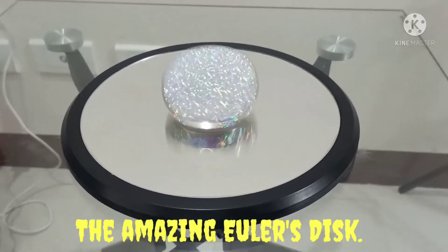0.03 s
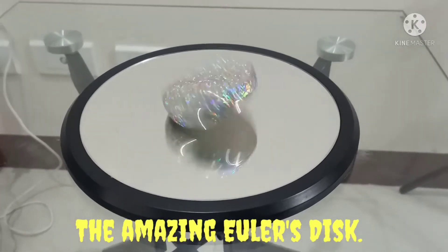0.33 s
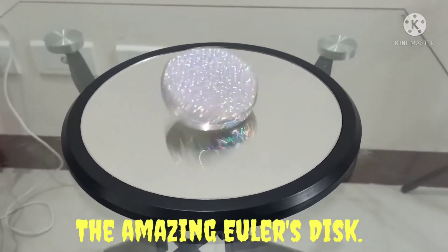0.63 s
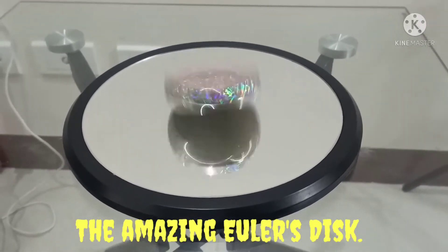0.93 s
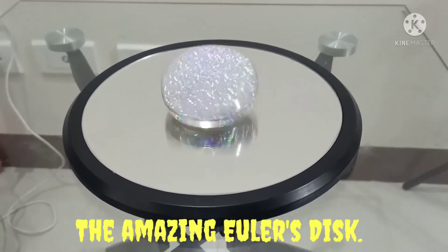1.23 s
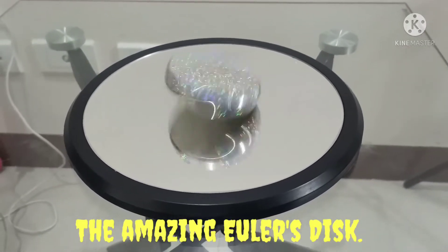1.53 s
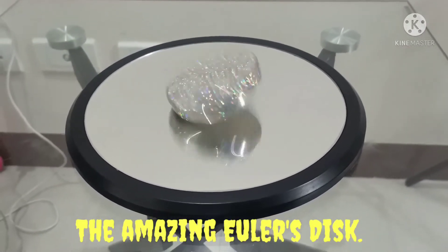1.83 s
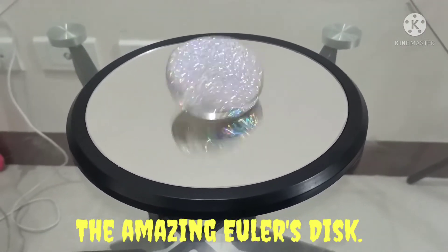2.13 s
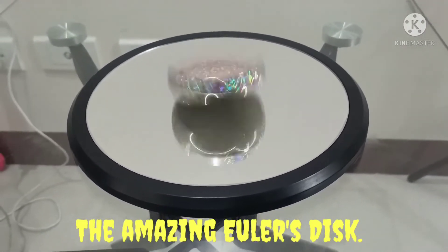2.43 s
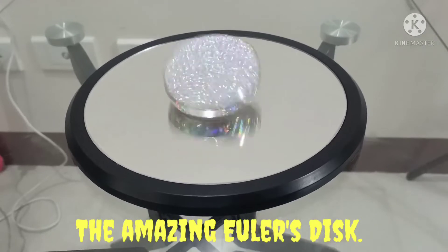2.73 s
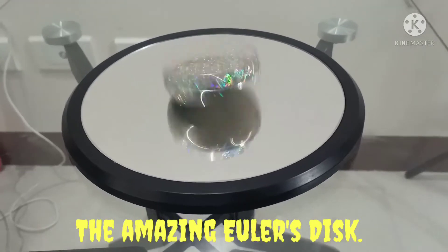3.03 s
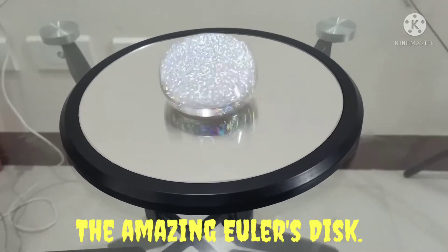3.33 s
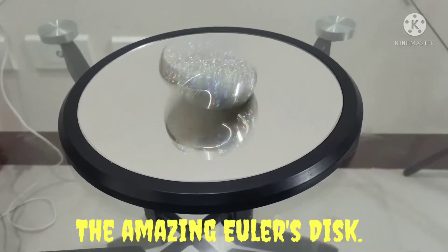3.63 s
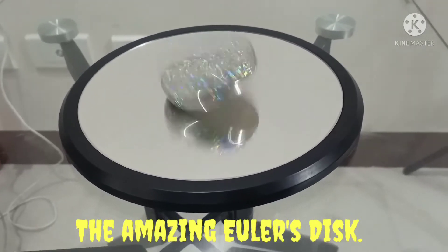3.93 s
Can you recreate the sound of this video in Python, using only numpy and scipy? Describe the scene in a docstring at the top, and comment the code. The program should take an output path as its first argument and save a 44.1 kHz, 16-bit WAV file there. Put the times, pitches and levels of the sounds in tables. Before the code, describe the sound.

A spinning metal disk whirs and rings close by on a mirror, wavering in fast, even pulses. Several times a second its base cracks and thuds against the glass table, while a small room rumbles faintly behind.

```python
"""A gritty, pulsing metallic ring: a heavy metal disk rolls on its rim round a mirror base on a glass table.
The contact point laps the mirror about eight times a second, slowly gaining speed. Tiny bumps under
the rim ring disk and mirror, whose resonances swell, fade and bend with each lap. Several times a
second the base knocks on the table with a crack and a thud. Behind it, a small room rumbles low."""
import sys
import numpy as np
from scipy import signal
from scipy.fft import rfft, irfft
from scipy.io import wavfile

SR = 44100
rng = np.random.default_rng(int(sys.argv[2]) if len(sys.argv) > 2 else 0)


def transcribe(u):
    """Save the signal u as a 16-bit wav file named by the first command-line argument.

    u: samples, shape (n,) or (channels, n), limited to [-1, 1]; the rate is SR.
    q: integer samples, one column per channel.
    """
    v = np.clip(np.atleast_2d(u).T, -1, 1)
    q = np.round(v * 32767).astype(np.int16)
    wavfile.write(sys.argv[1], SR, q)


N = 176400
TIME = np.arange(N) / SR

# tone of the room's rumble: (frequency [Hz], relative density [dB])
RUMBLE_COLOUR = [(15, -6.5), (26, 6.5), (42, -16.5), (59, 1), (80, -15.5), (150, -15.5), (235, -14.5),
                 (300, -18.5), (420, -31.5), (900, -52)]
# decay of the room's tail: (frequency [Hz], time to fall 60 dB [s])
ROOM_DECAY = [(200, 0.76), (1000, 0.25), (4000, 0.14), (14000, 0.28)]
# knocks of the base on the table: (time [s], sharp drive [dB], low drive [dB])
KNOCK_CUES = [(0.099, -21.5, -55), (0.112, -28, -47), (0.36, -26, -51), (0.469, -27, -55),
              (0.568, -25, -40), (0.688, -27.5, -65), (0.807, -25.5, -53), (0.825, -28, -64),
              (0.918, -26, -69), (1.041, -19.5, -40.5), (1.055, -27.5, -70), (1.067, -33, -54),
              (1.191, -25.5, -54), (1.274, -25.5, -41.5), (1.511, -22.5, -60), (1.536, -25, -49),
              (1.629, -22.5, -45), (1.744, -24.5, -44.5), (1.764, -32, -56), (1.985, -32, -65),
              (2.213, -23, -65), (2.243, -25, -62), (2.33, -23.5, -59), (2.589, -28, -46.5),
              (2.711, -27.5, -41), (2.912, -25, -53), (2.944, -28.5, -64), (3.03, -23, -50),
              (3.259, -24, -45.5), (3.524, -26, -59), (3.608, -22.5, -47), (3.724, -26, -52),
              (3.955, -22.5, -40), (3.978, -23.5, -47)]
# tone of a knock's dry crack: (frequency [Hz], relative level [dB])
CRACK_COLOUR = [(200, -20), (420, -58), (600, -31), (850, -8), (1150, -24.5), (1500, 1), (1800, 5),
                (2200, -6), (2750, -28), (3300, -21), (5000, -24), (7500, -4.5), (9000, -36.5),
                (15000, -48)]
# how hard a knock's sharp part rings the resonances: (frequency [Hz], relative drive [dB])
KNOCK_DRIVE = [(900, 65.5), (1300, 59), (1540, 67.5), (1850, 31), (2200, 55), (3300, 59.5), (7500, 45),
               (14000, 50)]
# modes of base and table, the same all round the lap: (pitch [Hz], width [Hz], gain [dB])
BASE_MODES = [(225, 110, -78), (300, 35, -80), (520, 45, -74.5), (573, 26, -70.5), (665, 50, -78),
              (800, 40, -75), (865, 35, -64), (950, 35, -61.5), (1002, 35, -65), (1049, 30, -64),
              (1165, 35, -69.5), (1253, 25, -69), (1310, 30, -66)]
# resonances of disk and mirror: (pitch [Hz], width [Hz], gain [dB], swing once a lap [dB], peak [laps],
# swing twice a lap [dB], peak [laps], swing once a rim turn [dB])
DISK_MODES = [ (931, 49, -60, 1.5, .4, 1.8, 0.034, 0.2), (1344, 59, -58.5, 0.6, 0, 0.19, 0.74, 0.24),
              (1450, 80, -55.5, 4, .1, .8, .52, .8), (1534, 100, -48.0, 3.3, .13, .8, .53, .8),
              (1835, 170, -57.5, .3, .95, 2.2, .01, .5), (2016, 56.7, -56.5, 1.0, 0.0081, 0.41, 0.19, 2.5),
              (2170, 111, -53, 2.2, 0.68, 0.84, 0.57, 3.16), (2285, 24, -66, 1.3, 0.36, 0.57, 0.035, 0.79),
              (3259, 135, -59, 0.58, 0.2, 3.1, 0.096, 0.13), (3520, 130, -67, 1.8, 0, 0.92, 0.62, 0.19),
              (3960, 87, -70, 1.4, 0.24, 2.6, 0, 0.32), (4466, 470, -62.5, 1.2, 0.16, 1.2, 0, 0.84),
              (5730, 324, -61.5, 0.77, .0, 0.17, 0.13, 0.79), (6060, 260, -62, 1.5, .0, 0.7, 0, .9),
              (6874, 220, -57.5, 0.6, 0.59, 0.6, 0, 1.56), (7256, 330, -58.5, 4.7, 0, 3.2, 0.0084, 1.8),
              (7670, 380, -56.5, 3.2, .99, 3.5, 0.092, 1.3), (8150, 160, -64, 0.27, 0.71, 0.24, 0, 0.59),
              (9430, 690, -67.5, 0.67, 0.39, 2.9, 0.1, 1.4), (11260, 200, -75.5, 3.8, 0.94, 2.3, 0.43, 2.2),
              (11370, 260, -72, 1, 1, .6, 0.56, 1.6), (12870, 89, -83, 3.0, .06, 2.2, .0, 2.1),
              (13800, 290, -75.5, 2, .47, 2.5, .15, 1.3), (15000, 1100, -77, .6, .4, 1.5, .1, 1.0)]
# the moving load bends the pitch: (frequency [Hz], once a lap [fraction], twice a lap [fraction])
LOAD_BEND = [(1000, 0.0032, 0.0023), (1540, 0.014, 0.005), (2350, 0.0049, 0.0016), (3300, .018, -0.002),
             (4500, .005, .007), (5900, 0.0068, 0.007), (7170, 0.014, 0.022), (8100, 0.0053, 0.015),
             (9500, .001, 0.0049), (14300, .001, .001)]
# slow level ride on the rolling tones near 2 kHz: (time [s], level [dB])
SING_RIDE = [(0, 0.5), (1.3, -0.8), (2.3, -2), (3.35, 2.5), (3.7, 0), (4, 0.5)]

LAPS_PER_S, LAPS_GAIN_PER_S2, START_LAP = 8.425, .062, .1585
RIM_TURNS_PER_LAP, RIM_ROUGHEST_TURN = .841, .89
BEND_ONCE_PEAK_LAP, BEND_TWICE_PEAK_LAP = .55, .42
BUMPS_PER_S, BUMP_SPREAD_DB = 9000, 2
FLUTTER_DB, FLUTTER_HZ = .68, 129  # unsteady contact force
ROLL_DB, ROLL_RISE_DB_PER_S = -.36, .3144  # the rolling grows a little with speed
SING_FROM_HZ, SING_TO_HZ = 1950, 2500
RATTLE_DECAY_S, RATTLE_DB = .0067, -7
CRACK_GAIN_DB, KNOCK_RING_GAIN_DB = 19, -7.5
THUD_HZ, THUD_WIDTH_HZ, THUD_GAIN_DB = 730, 287, 19.5
TABLE_RING_BELOW_HZ, TABLE_RING_GAIN_DB = 920, 76.5
RUMBLE_DB, ROOM_SEND_DB, HIGH_CUT_HZ = -63, -12, 15480


def amp(db):
    """Decibels to gain."""
    return 10 ** (np.asarray(db) / 20)


def unit(x):
    """Scales to rms 1."""
    return x / np.sqrt(np.mean(x ** 2) + 1e-20)


def at_hz(table, hz):
    """Reads a table on a log-frequency axis."""
    frequency, value = np.transpose(table)
    return np.interp(np.log(hz + 1), np.log(frequency + 1), value)


def add(mix, start_s, sound):
    """Drops a sound into the mix at its cue."""
    part = mix[max(round(start_s * SR), 0):][:len(sound)]
    part += sound[:len(part)]


def shaped_noise(gain_at):
    """Noise coloured by a gain curve over frequency, rms 1."""
    spectrum = rfft(rng.standard_normal(N)) * gain_at(np.fft.rfftfreq(N, 1 / SR))
    return unit(irfft(spectrum, N))


def resonate(x, hz, width_hz):
    """A steep resonance on a steady or moving pitch: shift down, low-pass, shift back up."""
    carrier = np.exp(2j * np.pi * np.cumsum(hz * np.ones(N)) / SR)
    pole = np.exp(-np.pi * width_hz / SR)
    envelope = signal.lfilter([(1 - pole) ** 2], [1, -2 * pole, pole * pole], x / carrier + 1e-18)
    return 2 * (carrier * envelope).real / np.sqrt(np.pi * width_hz / (2 * SR))


def swing(turns, peak_at, per_turn=1):
    """A smooth rise and fall locked to the rotation."""
    return np.cos(2 * np.pi * per_turn * (turns - peak_at))


def rumble():
    """The bed: low background noise of the room."""
    return amp(RUMBLE_DB) * shaped_noise(lambda hz: amp(at_hz(RUMBLE_COLOUR, hz)))


def room_tail(sound):
    """The small room's short diffuse reverb, in which the lows hang longest."""
    hz, t, spectrum = signal.stft(rng.standard_normal(SR // 2), SR, nperseg=256)
    decay = amp(-60 * t / at_hz(ROOM_DECAY, hz)[:, None])
    _, tail = signal.istft(spectrum * decay, SR)
    tail[:SR // 250] = 0  # 4 ms pre-delay
    return signal.fftconvolve(sound, tail / np.linalg.norm(tail))[:N]


def knock_forces():
    """The base hits the table with a blow and a short rattle; returns the sharp part and the low push."""
    sharp, push = np.zeros(N), np.zeros(N)
    t = TIME[:SR // 20]
    for start_s, sharp_db, push_db in KNOCK_CUES:
        rattle = rng.standard_normal(len(t)) * np.exp(-t / RATTLE_DECAY_S)
        blow = amp(RATTLE_DB) * rattle / np.linalg.norm(rattle)
        blow[0] += 1  # the impact itself
        add(sharp, start_s, amp(sharp_db) * blow)
        add(push, start_s, amp(push_db) * blow)
    return sharp, push


def knock_crack(sharp):
    """The dry crack of each blow, minimum-phase for an instant attack."""
    size = 4096
    colour = amp(at_hz(CRACK_COLOUR, np.fft.rfftfreq(size, 1 / SR)))
    cepstrum = irfft(np.log(colour))
    cepstrum[1:size // 2] *= 2
    cepstrum[size // 2 + 1:] = 0
    crack = irfft(np.exp(rfft(cepstrum)))
    return amp(CRACK_GAIN_DB) * signal.fftconvolve(sharp, crack)[:N]


def knock_send(sharp, hz):
    """The drive that the blows feed into a resonance at this pitch."""
    return sharp * amp(KNOCK_RING_GAIN_DB + at_hz(KNOCK_DRIVE, hz))


def base_and_table(roll, sharp, push):
    """Rolling hums through the steady modes; a knock's push rings the low ones, its sharp part the rest."""
    body = np.zeros(N)
    for hz, width, db in BASE_MODES:
        knock = push * amp(TABLE_RING_GAIN_DB) if hz < TABLE_RING_BELOW_HZ else knock_send(sharp, hz)
        body += amp(db) * resonate(roll + knock, hz, width)
    return body


def rolling_force():
    """The grit: dense tiny bumps under the rim, pressed by an unsteady load."""
    size = amp(BUMP_SPREAD_DB * np.minimum(rng.exponential(1, N), np.log(100)))
    bumps = size * rng.choice([-1, 1], N) * (rng.random(N) < BUMPS_PER_S / SR)
    flutter = shaped_noise(lambda hz: 1 / (1 + (hz / FLUTTER_HZ) ** 2))
    return unit(bumps * amp(FLUTTER_DB * flutter)) * amp(ROLL_DB + ROLL_RISE_DB_PER_S * TIME)


def disk_on_mirror(roll, sharp):
    """Rolling and knocks ring disk and mirror; the circling contact swells and bends each resonance."""
    laps = START_LAP + LAPS_PER_S * TIME + .5 * LAPS_GAIN_PER_S2 * TIME ** 2
    rim_roughness = swing(RIM_TURNS_PER_LAP * laps, RIM_ROUGHEST_TURN)
    bend_once = swing(laps, BEND_ONCE_PEAK_LAP)
    bend_twice = swing(laps, BEND_TWICE_PEAK_LAP, per_turn=2)
    bend_hz, once_depth, twice_depth = np.transpose(LOAD_BEND)
    ring = np.zeros(N)
    for hz, width, db, once_db, once_at, twice_db, twice_at, rim_db in DISK_MODES:
        swell_db = once_db * swing(laps, once_at) + twice_db * swing(laps, twice_at, per_turn=2)
        swell_db += rim_db * rim_roughness
        if SING_FROM_HZ < hz < SING_TO_HZ:
            swell_db += np.interp(TIME, *np.transpose(SING_RIDE))
        bend = np.interp(hz, bend_hz, once_depth) * bend_once
        bend += np.interp(hz, bend_hz, twice_depth) * bend_twice
        drive = roll * amp(swell_db) + knock_send(sharp, hz)
        ring += amp(db) * resonate(drive, hz * (1 + bend), width)
    return ring


def scene():
    """The mono mix: disk, base and knocks up front, room tail and rumble behind."""
    roll = rolling_force()
    sharp, push = knock_forces()
    thud = amp(THUD_GAIN_DB) * resonate(push, THUD_HZ, THUD_WIDTH_HZ)
    direct = disk_on_mirror(roll, sharp) + base_and_table(roll, sharp, push) + knock_crack(sharp) + thud
    return (direct + amp(ROOM_SEND_DB) * room_tail(direct) + rumble())[None]


def record(dry):
    """A steep high cut takes the very top off the mix."""
    high_cut = signal.firwin(511, HIGH_CUT_HZ, window=("kaiser", 9), fs=SR)
    return signal.oaconvolve(dry, high_cut[None], "same")


dry = scene()
out = record(dry)
transcribe(out)
```